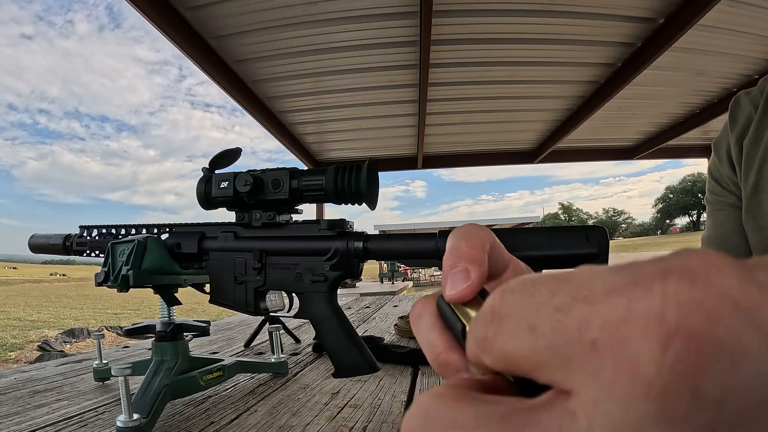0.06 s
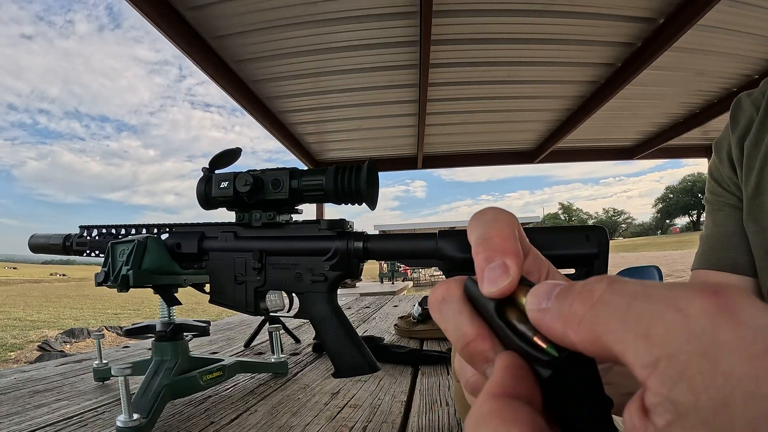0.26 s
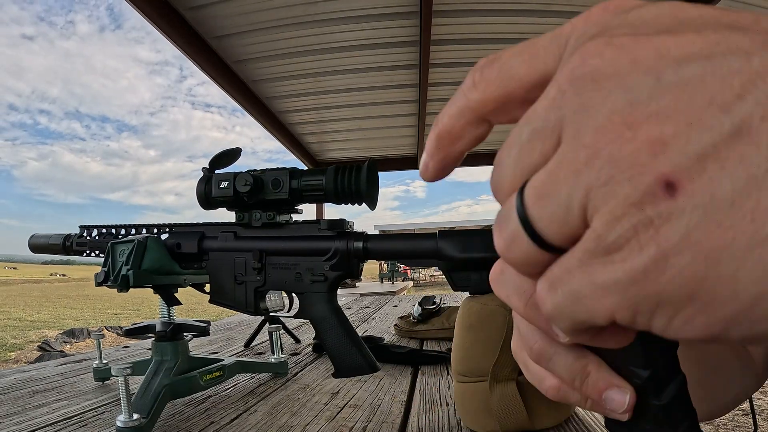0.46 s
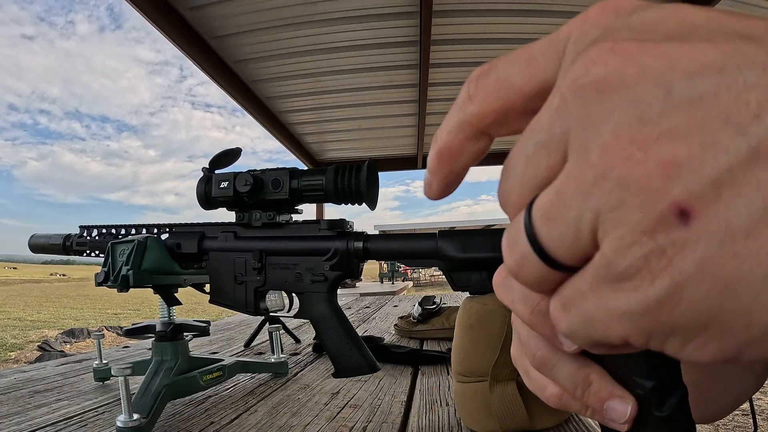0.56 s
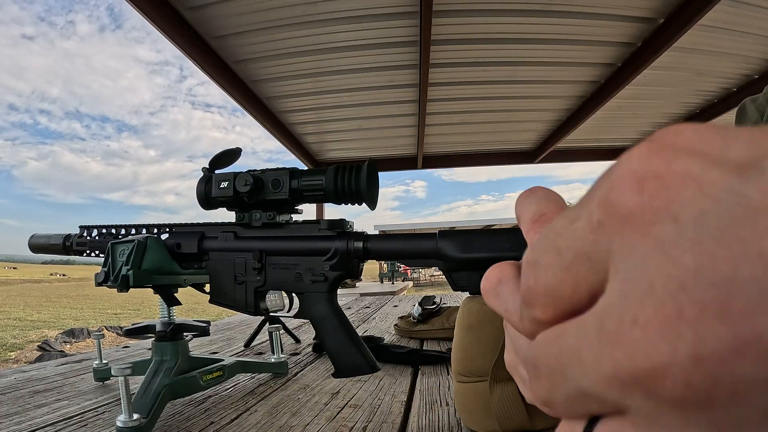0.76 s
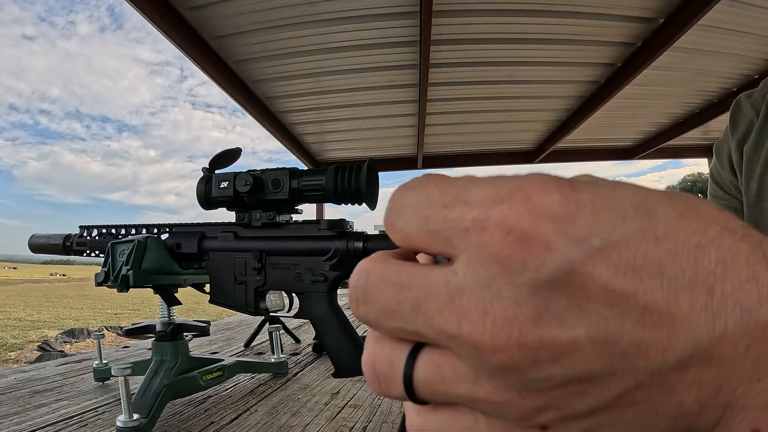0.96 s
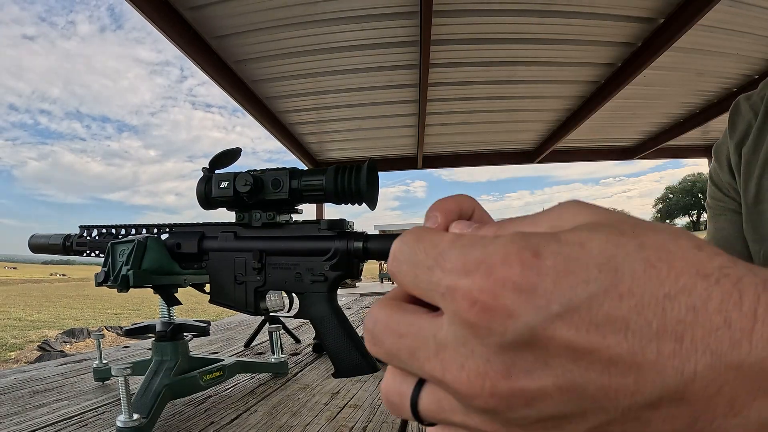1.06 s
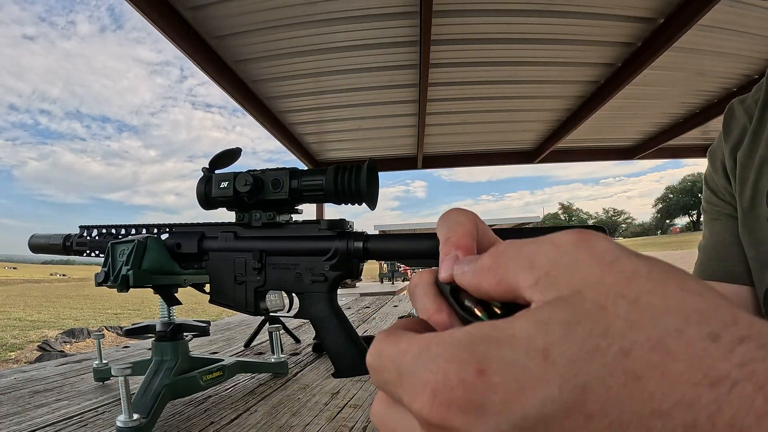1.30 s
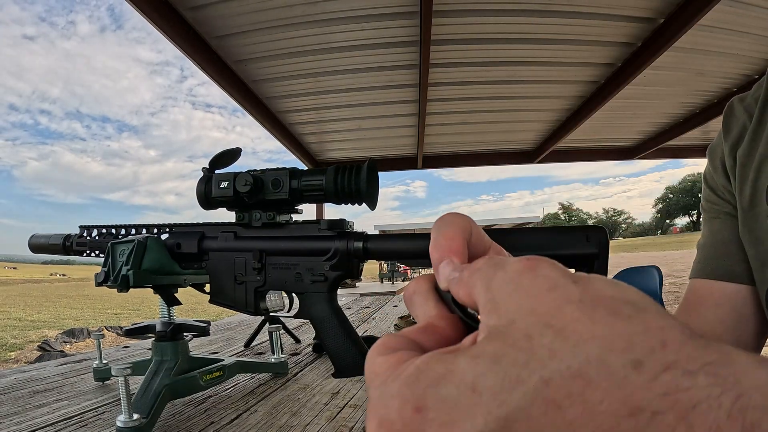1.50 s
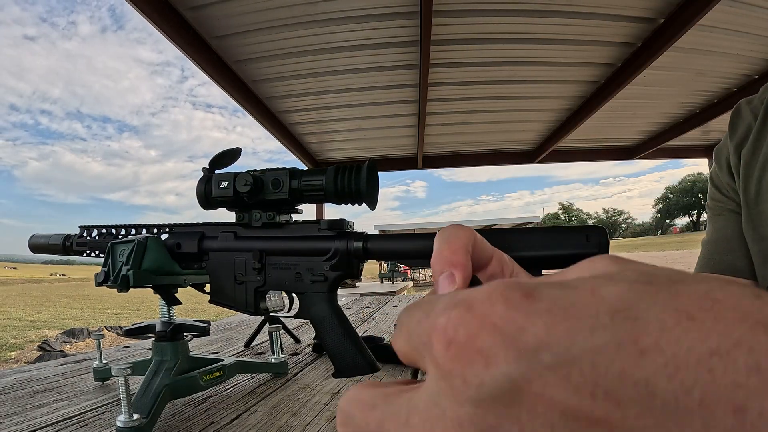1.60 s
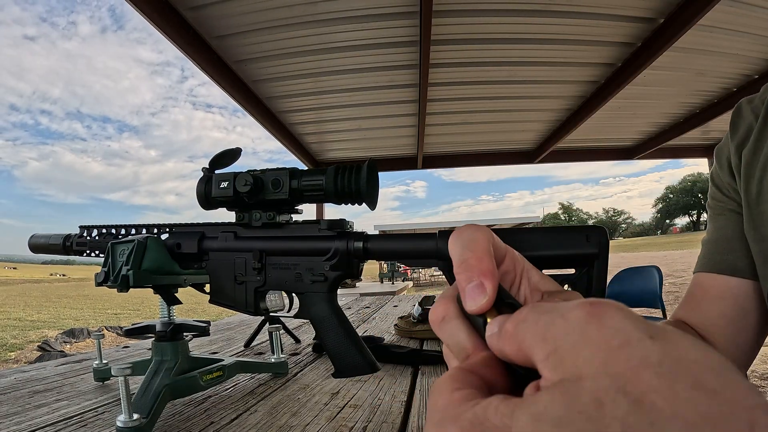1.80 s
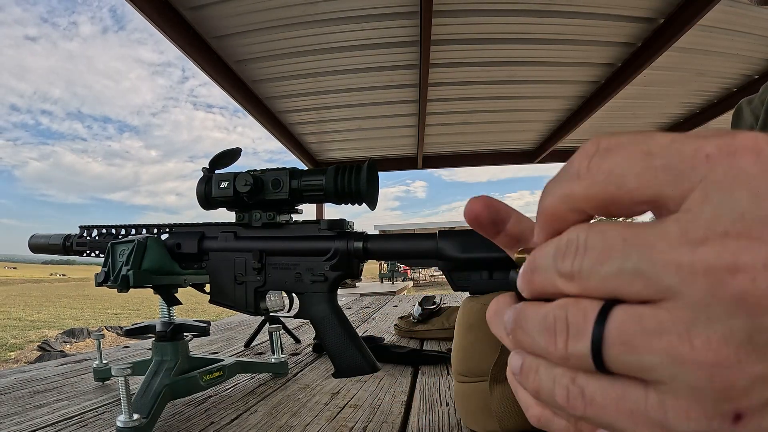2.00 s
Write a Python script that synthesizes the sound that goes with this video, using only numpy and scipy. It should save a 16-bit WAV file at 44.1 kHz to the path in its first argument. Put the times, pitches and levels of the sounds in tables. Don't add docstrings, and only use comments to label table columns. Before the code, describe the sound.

Cartridges snap into a rifle magazine, close and dry. Faint handling taps lead to a loud clattering snap at 0.25 s, then clicks at 0.43 and 0.5. Another sharp snap lands at 0.75-0.8, clicks at 1.06-1.11, and the loudest at 1.37-1.4 with a loose case bouncing and ringing. Clicks follow at 1.54 and 1.73; soft wind rumbles near the end over faint hush and insects.

```python
import sys
import numpy as np
from scipy import signal
from scipy.fft import rfft, irfft
from scipy.io import wavfile
from scipy.ndimage import uniform_filter1d

SR = 44100
rng = np.random.default_rng(int(sys.argv[2]) if len(sys.argv) > 2 else 0)


def dump_mix(stems):
    frames = np.atleast_2d(stems).T
    limited = np.clip(frames, -1, 1)
    pcm = np.round(limited * 32767).astype(np.int16)
    wavfile.write(sys.argv[1], SR, pcm)


def linear_from_db(decibels):
    return 10 ** (np.asarray(decibels, float) / 20)


N = 90404

# (time [s], peak [dB], body [dB], bright [dB], chatter [s])
SNAPS = [
    (.2505, 1, 7.5, 0.5, 0.0024),
    (.258, 1.5, 2.5, -16, 0.0018),
    (.2642, 4.5, -24, -0.5, 0.0055),
    (.75, 0, -1.5, -4, 0.0013),
    (.756, -1, -0.5, -8, 0.0065),
    (.7875, 6, -7, 5, 0.0043),
    (1.371, -0.5, -1, -7, 0.009),
    (1.3815, 8.5, -5.5, 2.5, 0.004),
]
# (time [s], peak [dB], body [dB], bright [dB], chatter [s])
WALL_CLICKS = [
    (.4282, -10, -4, 0, .004),
    (.4985, -1, -2, 0, .002),
    (1.0635, -3, 3, -8, .0018),
    (1.0828, 0, -12, 8, .001),
    (1.1095, 2, -8, 4, .0015),
    (1.5365, -15, -4, -13, .0015),
    (1.7285, -6, -6, -8, .002),
    (1.7425, 2, -5, -1, .002),
]
# (time [s], peak [dB], body [dB], bright [dB])
CASE_CLACKS = [(.243, -4, 2, -14), (.247, -5.5, 9.5, 9.5), (.286, -2, -40, -8), (.295, -4, -29, -2),
               (0.4385, -12, -2, -14), (.508, -7, 0, -7), (.769, -5, 5, -16), (0.78, -11.5, 11, -2),
               (1.07, -6.5, -17, -21), (1.123, -13.5, 2, 10), (1.36, -9.5, 11, -3), (1.366, -3.5, 6, -1),
               (1.738, -4.5, -1, 0), (1.758, -5.5, -27, -7)]
# (time [s], peak [dB], crack [dB])
CASE_BOUNCES = [(1.3965, -10, 2), (1.4, -14, -12), (1.4045, -8, 2), (1.414, -10, -4), (1.4225, -13, -12),
                (1.4302, -9, -2.5), (1.44, -22, -14), (1.4495, -19, -25), (1.459, -18.5, -21),
                (1.4661, -13.5, -24), (1.478, -32, -16), (1.5021, -23.5, -14), (1.506, -33, -17),
                (1.758, -16.5, -16), (1.768, -14.5, -18)]
# (time [s], peak [dB], centre [Hz], spread [octaves], fade
# [ms])
NOISY_KNOCKS = [(0.038, -22, 1740, 0.41, 2.4), (0.0447, -26, 3250, 0.11, 2), (.049, -26.5, 3230, 0.38, 1.7),
                (0.0567, -22, 6200, 0.38, 2.4), (0.0634, -16.5, 483, 0.42, 1.08),
                (0.064, -30.5, 3070, 0.25, 2), (0.1584, -26.5, 900, 0.28, 2.9), (.19, -44, 2480, 0.53, 1.5),
                (0.334, -28, 3200, 0.16, 1.5), (0.4314, -4.5, 2470, 0.22, 0.81),
                (.4405, -2, 1850, 1.05, 1.7), (0.4291, -9, 870, 0.7, 7.5), (.5, -5.5, 3650, 0.43, 1.5),
                (0.5071, -5.5, 1500, 1.02, 0.56), (.566, -30.5, 7000, 0.81, 3.), (.612, -17, 3300, 0.6, 1.9),
                (0.786, -17, 11500, .35, 1.9), (1.381, -3.5, 11500, 0.26, 2.8), (1.265, -23, 885, 0.65, 3.7),
                (1.7375, -9.5, 530, 0.49, 1.5), (.974, -36.5, 2000, 0.14, 6.),
                (1.064, -5.5, 2870, 0.11, 0.74), (1.083, -4.5, 5630, 0.075, 0.8),
                (1.5366, -3, 1380, 1.06, 1.85), (.9985, -21, 624, 0.41, 1.4), (.7502, -3.5, 4530, 0.13, 2.4),
                (.797, -13, 3060, 0.37, 23), (1.6, -28, 2750, 0.17, 1.5)]
# (time [s], pitch [Hz], level [dB], 60 dB fade [s])
LEFTOVER_RINGS = [(.508, 1184, -35, .2), (.508, 1556, -27, .08), (.508, 2525, -38, .1),
                  (.508, 3752, -38, .08), (.625, 3220, -44, .15), (1.065, 3000, -20, .05),
                  (1.084, 3042, -28, .12), (1.111, 834, -36, .4), (1.111, 1900, -24, .06),
                  (1.111, 3042, -32, .13), (1.111, 5125, -36, .12), (1.538, 841, -34, .15),
                  (1.538, 2029, -32, .08), (1.744, 1950, -24, .08)]
# (time [s], peak [dB], focus [Hz], spread [octaves])
LIGHT_TAPS = [(0.035, -14, 533, 0.26), (0.121, -32.5, 1190, 0.16), (.158, -30, 4000, 1.2),
              (0.164, -22, 1190, 1.34), (.178, -42, 2000, 0.56), (0.224, -43, 5200, .3),
              (.594, -19.5, 1500, 0.28), (.612, -14.5, 800, 1.1), (.702, -22, 1450, 0.33),
              (0.724, -20, 2520, 0.63), (0.897, -33.5, 4560, 0.42), (0.998, -15.5, 705, 1.22),
              (1.22, -22.5, 870, 1.4), (1.266, -12.5, 1280, 0.95), (1.319, -27.5, 790, 0.41),
              (1.6, -27, 4100, 1.15), (1.831, -36, 7000, 1), (1.903, -28.5, 2200, 0.95),
              (1.918, -33, 1830, 0.17), (1.942, -28, 6800, 0.3), (1.976, -35.5, 2600, .8)]
# (start [s], hold [s], level [dB], bright [dB], 60 dB fade [s])
SETTLING = [(.268, 0.011, -20, -4.5, 0.18), (0.421, 0.0098, -40, -2, 0.061),
            (0.5, 0.0042, -27.5, -27, 0.12), (0.756, 0.02, -33, -6.5, 0.055),
            (0.797, 0.021, -24.5, -3.5, 0.13), (1.068, 0.004, -25.5, -17, 0.18),
            (1.081, 0.014, -32, -7.5, 0.087), (1.11, 0.016, -31, -13, 0.04),
            (1.385, 0.028, -23, -8.5, 0.23), (0, 0.038, -43.5, -11, 0.29),
            (1.539, 0.0027, -25.5, -38, 0.038), (1.718, 0.047, -36, -4.5, 0.17),
            (1.749, 0.0043, -27, -7.5, 0.19)]
# (middle [s], width [s], level [dB], bright [dB])
FINGER_RUBS = [(.125, 0.0053, -69, -9), (0.161, 0.0023, -37.5, -10), (0.421, 0.02, -45.5, -9),
               (0.621, 0.04, -47.5, -14), (.725, 0.016, -42.5, -14.5), (.055, 0.0038, -58, -6),
               (0.898, 0.01, -52.5, -9.5), (0.986, 0.013, -46.5, -2.5), (1.204, 0.017, -56.5, -0.5),
               (1.324, 0.0049, -48, -8), (1.67, 0.027, -48, -9.5), (1.97, 0.047, -58.5, -3.5)]
# (pitch [Hz], level [dB], 60 dB fade [s])
BODY_TONES = [(481, -4.5, 0.047), (646, 3, 0.013), (874, 8, 0.013), (1210, 6, 0.016), (1500, 0, 0.0069)]
# (pitch [Hz], level [dB], 60 dB fade [s])
BRASS_TONES = [(1976, 0.5, 0.039), (2416, 14, 0.0057), (2932, 6.5, 0.014), (3302, -7, 0.073),
               (4290, 3.5, 0.008)]
# (pitch [Hz], level [dB], 60 dB fade [s])
STEEL_TONES = [(4810, 0.5, 0.046), (5200, 15, 0.012), (5717, 1.5, 0.014), (7220, 9.5, 0.008),
               (10200, -28, 0.008), (10870, -8, 0.018)]
# (pitch [Hz], level [dB], 60 dB fade [s])
LOOSE_CASE_TONES = [(1450, -12, .03), (1891, -6, .04), (1954, -1, .06), (2050, -6, .04), (2370, -3, .025),
                    (3045, -3, .045), (4851, 0, .04), (5010, -3, .03)]
# (frequency [Hz], level [dB per Hz])
CRACK_COLOUR = [(1500, -9), (3500, -1), (6000, 3), (10000, -3.5), (14000, -9.5), (16000, -6)]
# (frequency [Hz], level [dB per Hz])
HUSH_COLOUR = [(88, -2), (150, 6.5), (484, 9.5), (1660, -7.5), (1940, -6.5), (3700, -14), (5150, -12),
               (10200, -13), (16000, -21)]
# (time [s], level [dB])
WIND_LEVEL = [(0, -45), (.5, -47), (.65, -38.5), (.8, -46.5), (1.6, -47), (1.664, -33), (1.72, -29.5),
              (1.8, -35.5), (1.87, -36.5), (1.899, -27), (1.93, -35), (1.96, -28), (2.0, -40.5),
              (2.05, -33.5)]
# (frequency [Hz], level [dB per Hz])
WIND_RUMBLE = [(12, -53), (20, -7.5), (65, -2), (162, -6.5), (420, -32), (492, -24), (600, -36), (780, -65),
               (1320, -120)]

GRIPPED_DB = -27
CRACK_S = 0.0015


def evened(x):
    return x / np.sqrt(np.mean(x ** 2) + 1e-20)


def peaked(db, sound):
    return linear_from_db(db) * sound / abs(sound).max()


def colour(x, points):
    f, db = np.transpose(points)
    hz = np.fft.rfftfreq(len(x), 1 / SR)
    gain = linear_from_db(np.interp(np.log(hz + 1), np.log(f + 1), db))
    return evened(irfft(rfft(x) * gain, len(x)))


def wander(span_s):
    width = round(span_s * SR)
    drift = uniform_filter1d(rng.standard_normal(N), size=width)
    return evened(uniform_filter1d(drift, size=width))


def add(mix, s, sound):
    part = mix[max(round(s * SR), 0):][:len(sound)]
    part += sound[:len(part)]


def ring(modes, vary=1, linger_db=GRIPPED_DB):
    scatter_db, detune, linger = 2.5, .025, 4
    t = np.arange(4000)[:, None] / SR
    hz, db, t60 = np.tile(np.transpose(modes), 2)
    level = linear_from_db(db + scatter_db * vary * rng.standard_normal(len(hz)))
    pitch = hz * (1 + detune * vary * rng.standard_normal(len(hz)))
    fall_db = 60 * t / t60
    fade = linear_from_db(-fall_db) + linear_from_db(linger_db - fall_db / linger)
    out = (level * fade * np.sin(2 * np.pi * pitch * t)).sum(1)
    return out / np.linalg.norm(out)


def magazine(drive, body_db, steel_db):
    body = linear_from_db(body_db) * ring(BODY_TONES)
    steel = linear_from_db(steel_db) * ring(STEEL_TONES, linger_db=GRIPPED_DB - 9)
    voice = body + ring(BRASS_TONES) + steel
    return signal.fftconvolve(drive, voice)[:len(drive)]


def blows(table, mix):
    contact_s, crack_db = 0.00068, -21.5
    t = np.arange(4000) / SR
    for s, db, body_db, bright_db, *more in table:
        chatter_s = sum(more)
        late = np.maximum(t - chatter_s, 0)
        crack = linear_from_db(crack_db) * colour(rng.standard_normal(len(t)), CRACK_COLOUR) * np.exp(-late / CRACK_S)
        drive = rng.standard_normal(len(t)) * np.exp(-late / contact_s)
        drive = drive / np.linalg.norm(drive) * np.sqrt(1 + chatter_s / 0.008)
        sound = magazine(drive, body_db, bright_db) + linear_from_db(bright_db) * crack
        add(mix, s, peaked(db, sound))


def bounces(mix):
    t = np.arange(4000) / SR
    for s, db, crack_db in CASE_BOUNCES:
        strike = rng.standard_normal(len(t)) * np.exp(-t / 0.00045)
        tone = signal.fftconvolve(strike, ring(LOOSE_CASE_TONES, .45, -30))[:len(t)]
        crack = colour(rng.standard_normal(len(t)), CRACK_COLOUR) * np.exp(-t / CRACK_S)
        add(mix, s, peaked(db, tone) + peaked(db + crack_db, crack))


def knocks(mix):
    t = np.arange(8000) / SR
    for s, db, hz, spread, fade_ms in NOISY_KNOCKS:
        edges = hz * 2. ** (spread * np.array([-1, 1]))
        burst = rng.standard_normal(len(t)) * np.minimum(t / .0004, 1) * np.exp(-1000 * t / fade_ms)
        resonance = signal.butter(2, edges, "band", fs=SR, output="sos")
        add(mix, s, peaked(db, signal.sosfilt(resonance, burst)))


def leftover_rings(mix):
    t = np.arange(8000) / SR
    for s, hz, db, t60 in LEFTOVER_RINGS:
        flutter_db = 5 * wander(.004)[:len(t)]
        fade = linear_from_db(db - 60 * t / t60 + flutter_db) * np.minimum(t / .002, 1)
        add(mix, s, fade * np.sin(2 * np.pi * hz * t))


def taps(mix):
    tap_s = 0.0019
    t = np.arange(4000) / SR
    modes = np.concatenate([BODY_TONES, BRASS_TONES, STEEL_TONES])
    for s, db, focus_hz, spread in LIGHT_TAPS:
        near = modes.copy()
        distance = np.log2(modes[:, 0] / focus_hz) / max(spread, .2)
        near[:, 1] -= 4.3 * distance ** 2
        press = rng.standard_normal(len(t)) * t * np.exp(-2 * t / tap_s)
        sound = signal.fftconvolve(press, ring(near, .42))[:len(t)]
        add(mix, s, peaked(db, sound))


def grains(shape, per_s, body_db, bright_db, hiss_db):
    spread_db, steel_db = 2.5, -7
    chance, side, size = rng.random((3, len(shape)))
    clicks = (chance < per_s / SR) * np.sign(side - .5) * linear_from_db(-spread_db * np.log(size + 0.007))
    drive = evened(clicks)
    quick = shape * (shape / shape.max()) ** .23
    hiss = linear_from_db(bright_db + hiss_db) * colour(drive, CRACK_COLOUR) * quick
    return magazine(drive * shape, body_db, bright_db + steel_db) + hiss


def rattles(mix):
    t = np.arange(12000) / SR
    for s, hold, db, bright_db, t60 in SETTLING:
        shape = np.minimum(t / 0.0022, 1) * linear_from_db(db - 60 * np.maximum(t - hold, 0) / t60)
        add(mix, s, grains(shape, 5300, -20, bright_db, 7.5))


def rubs(mix):
    middle_s = .12
    t = np.arange(12000) / SR
    for s, width, db, bright_db in FINGER_RUBS:
        shape = linear_from_db(db) * np.exp(-.5 * ((t - middle_s) / width) ** 2)
        add(mix, s - middle_s, grains(shape, 10000, -0.5, bright_db, 13.5))


def handling():
    mix = np.zeros(N)
    for table in (SNAPS, WALL_CLICKS, CASE_CLACKS):
        blows(table, mix)
    for source in (bounces, knocks, leftover_rings, taps, rattles, rubs):
        source(mix)
    return signal.sosfilt(signal.butter(4, 378, "high", fs=SR, output="sos"), mix)


def roof(x):
    t60, gap_s, top_hz = 0.12, 0.0048, 6150
    t = np.arange(SR // 4) / SR
    echoes = (rng.random(len(t)) < .05) * rng.standard_normal(len(t))
    echoes = echoes * linear_from_db(-60 * t / t60) * (t > gap_s)
    echoes = signal.lfilter(*signal.butter(1, top_hz, fs=SR), echoes)
    return signal.fftconvolve(x, echoes / np.linalg.norm(echoes))[:N]


def insects():
    centre_hz, width_hz, level_db, throb_db = 10350, 1000, -56, 2
    hz = np.fft.rfftfreq(N, 1 / SR)
    gain = 1 / (1 + ((hz - centre_hz) / width_hz * 2) ** 4)
    band = irfft(rfft(rng.standard_normal(N)) * gain, N)
    return linear_from_db(level_db + throb_db * wander(.004)) * evened(band)


def wind():
    level = np.interp(np.arange(N) / SR, *np.transpose(WIND_LEVEL))
    return linear_from_db(level + 2.6 * wander(0.0024)) * colour(rng.standard_normal(N), WIND_RUMBLE)


def hush():
    return linear_from_db(-47.5 + wander(.05)) * colour(rng.standard_normal(N), HUSH_COLOUR)


def scene():
    hands = handling()
    return (hands + linear_from_db(-21) * roof(hands) + insects() + wind() + hush())[None]


def roll_off(x):
    return signal.sosfilt(signal.butter(12, 16990, fs=SR, output="sos"), x)


def record(dry):
    ceiling, edge_hz = .85, 15800
    held = dry / (1 + (abs(dry) / ceiling) ** 4) ** .25
    held = signal.oaconvolve(held, signal.firwin(255, edge_hz, fs=SR)[None], "same")
    return roll_off(held)


dry = scene()
out = record(dry)
dump_mix(out)
```